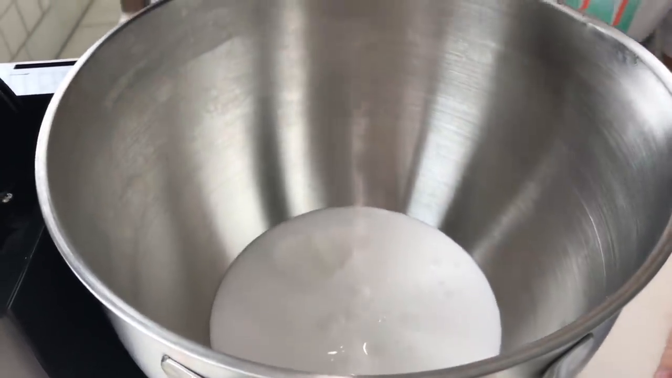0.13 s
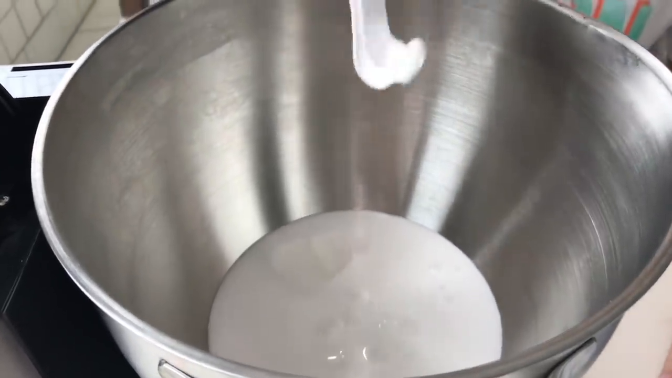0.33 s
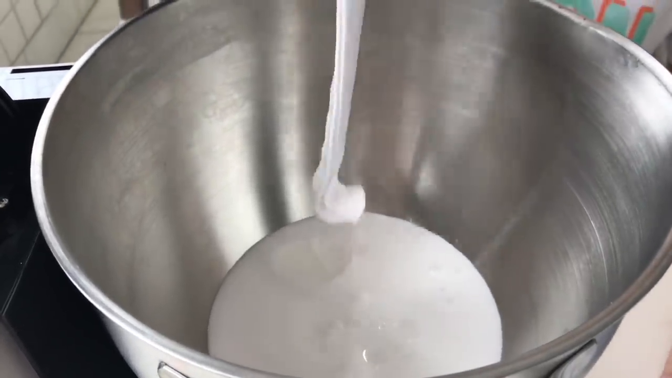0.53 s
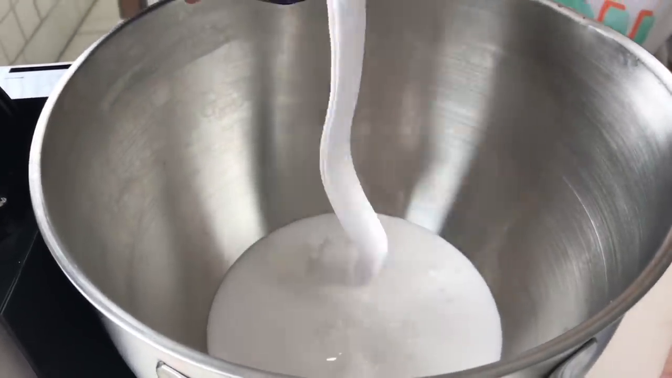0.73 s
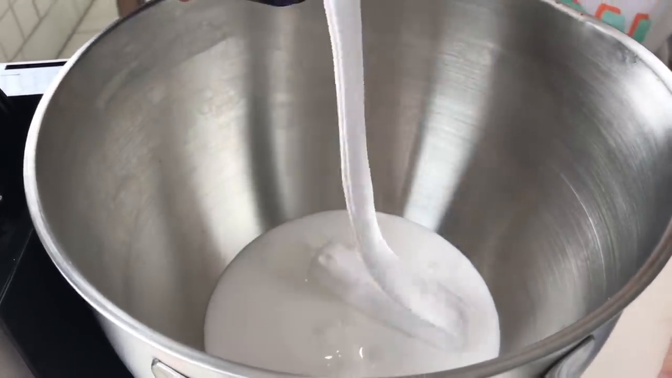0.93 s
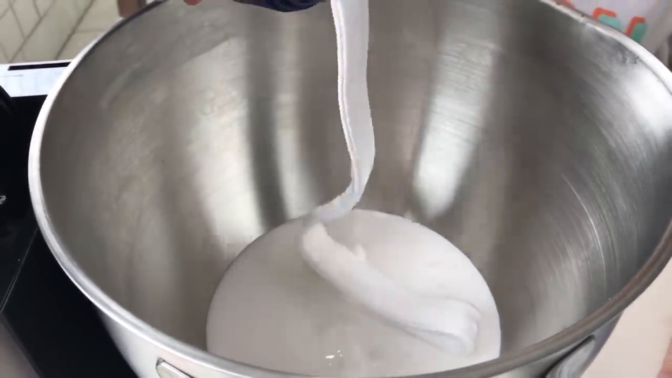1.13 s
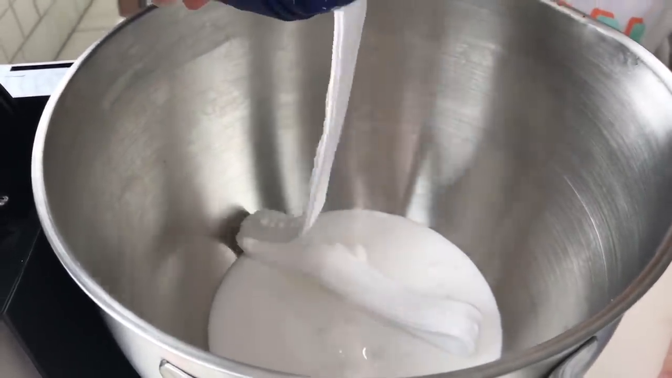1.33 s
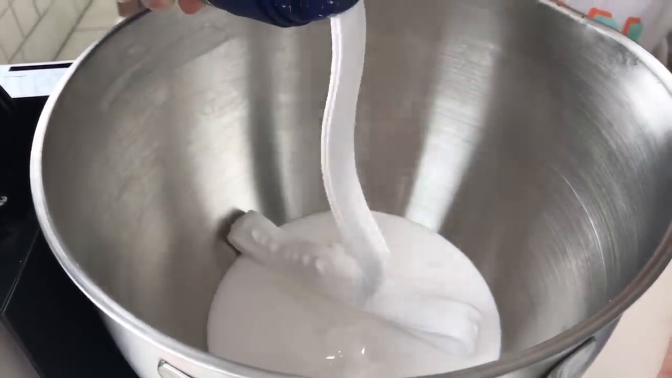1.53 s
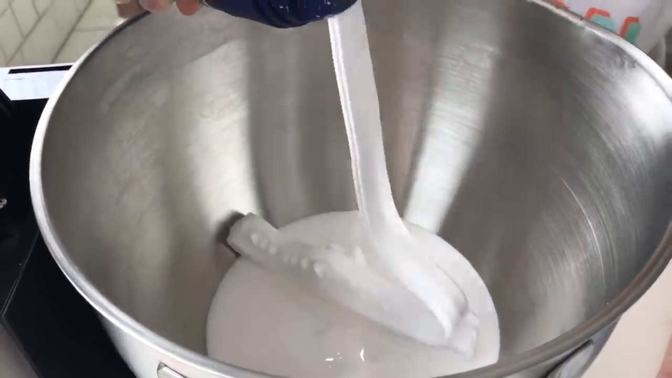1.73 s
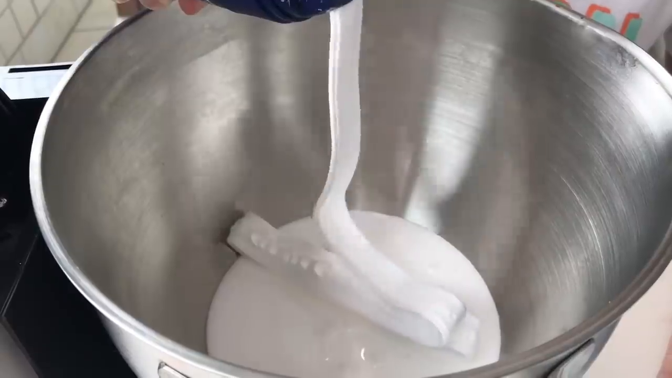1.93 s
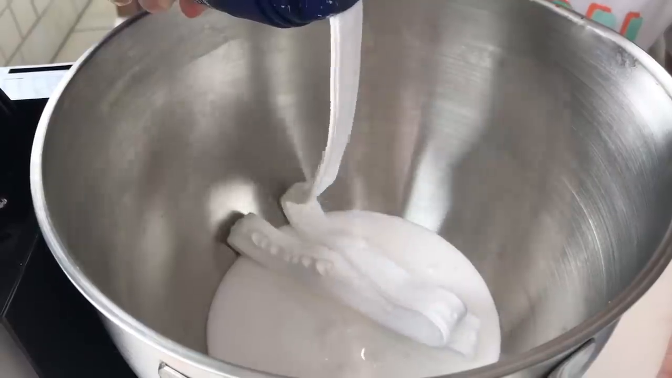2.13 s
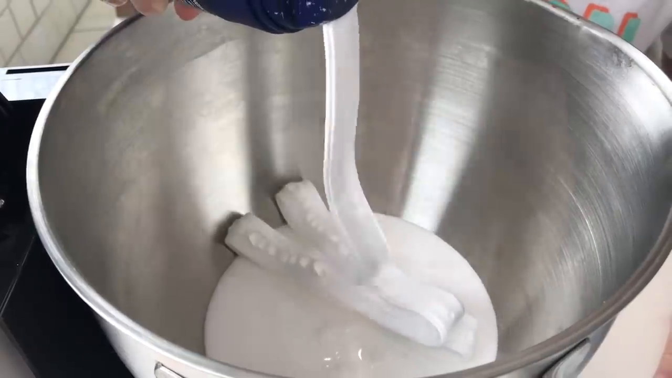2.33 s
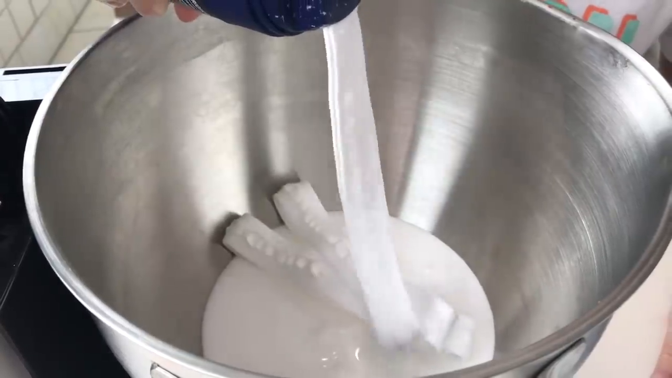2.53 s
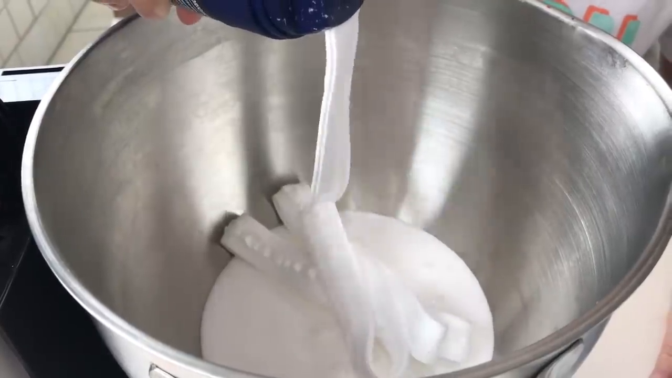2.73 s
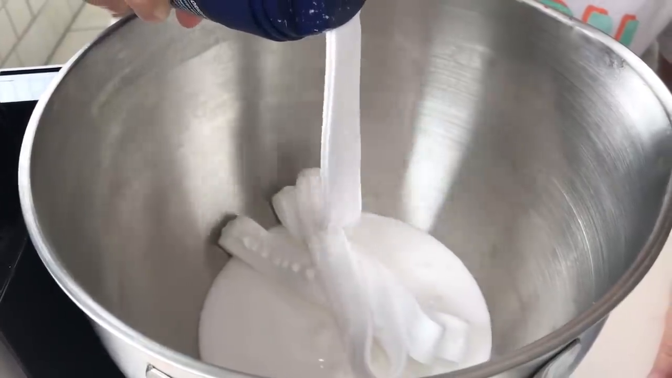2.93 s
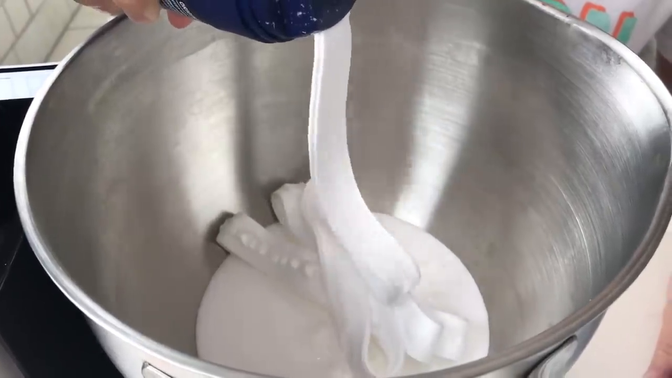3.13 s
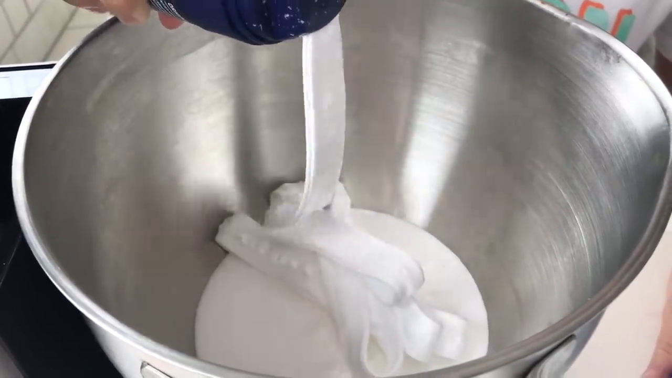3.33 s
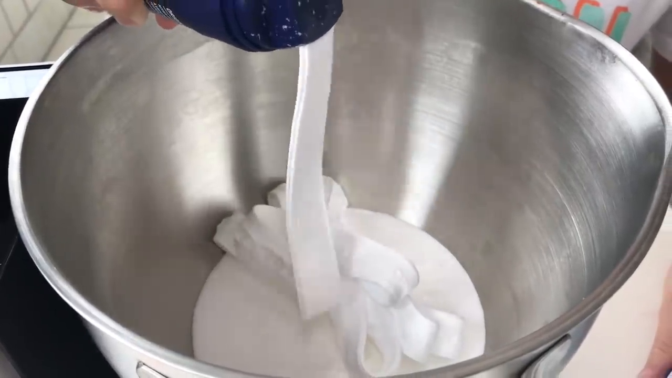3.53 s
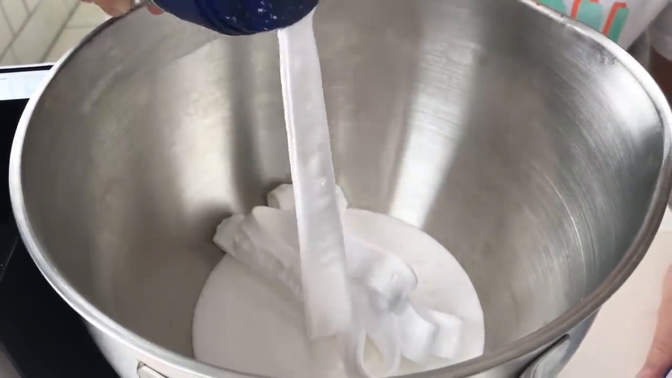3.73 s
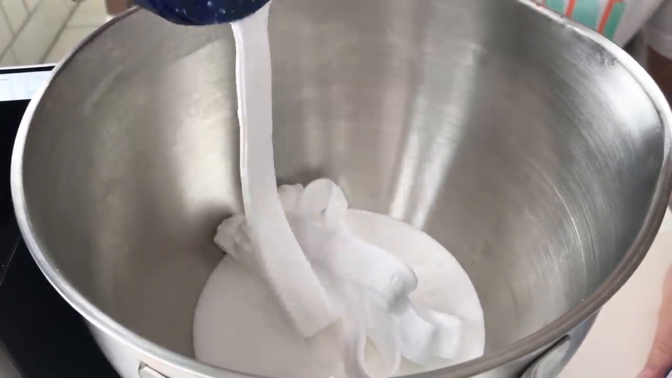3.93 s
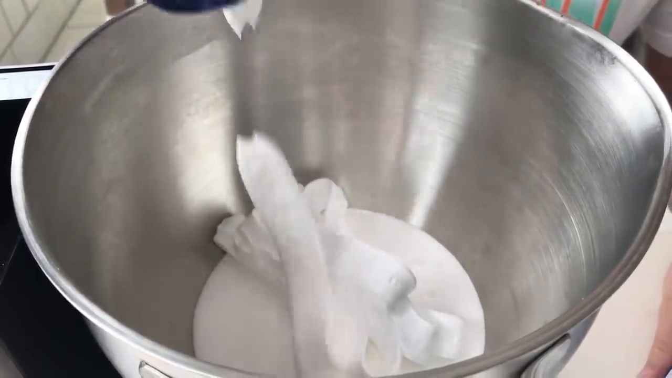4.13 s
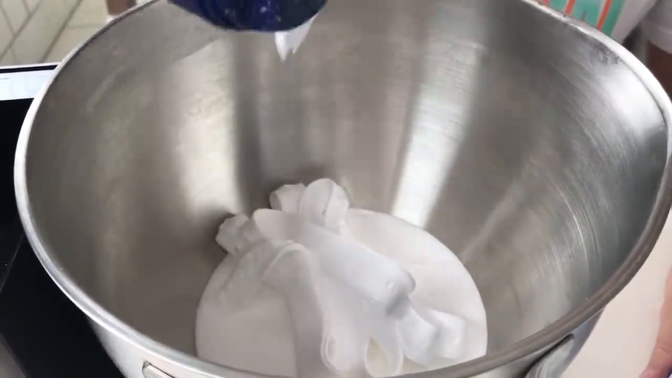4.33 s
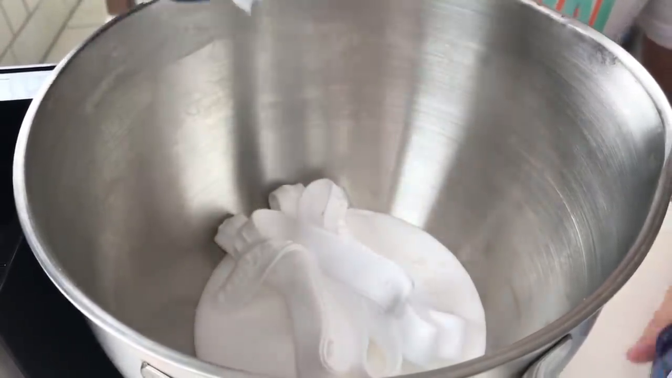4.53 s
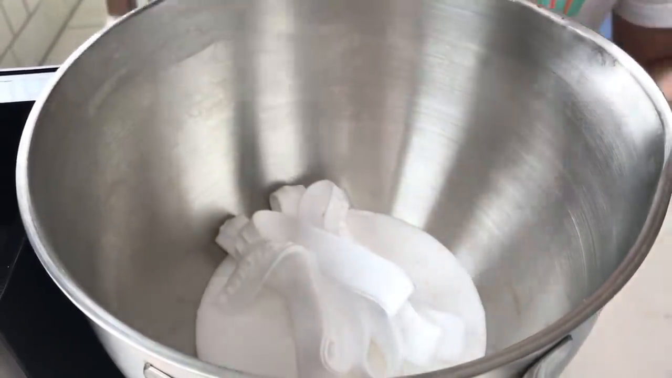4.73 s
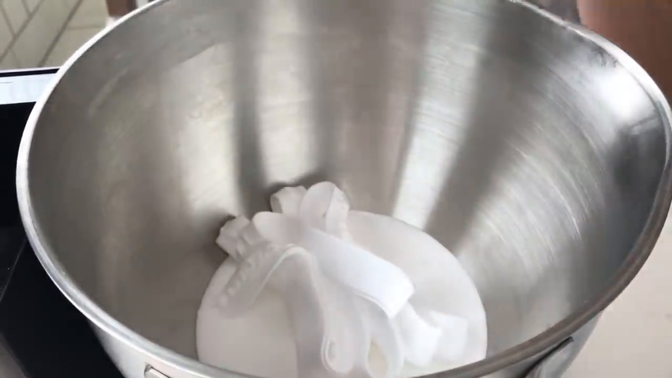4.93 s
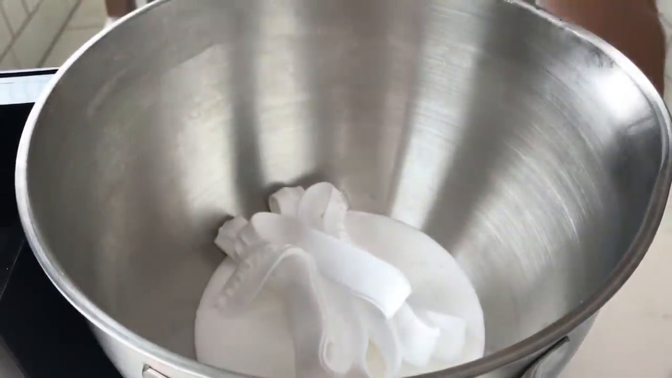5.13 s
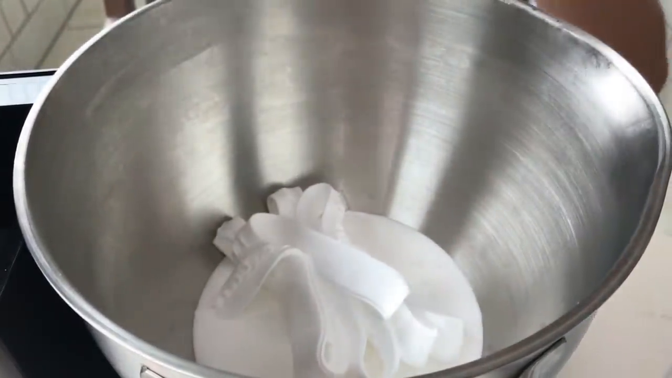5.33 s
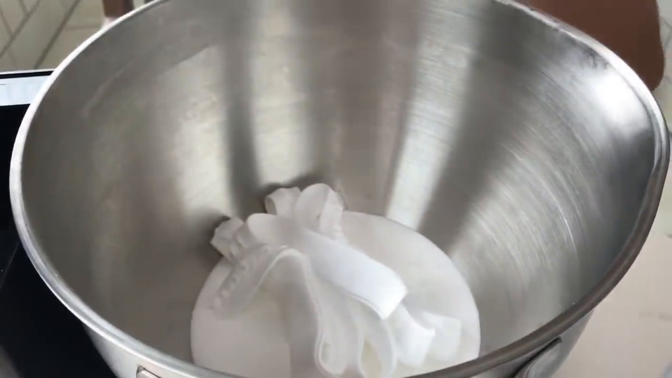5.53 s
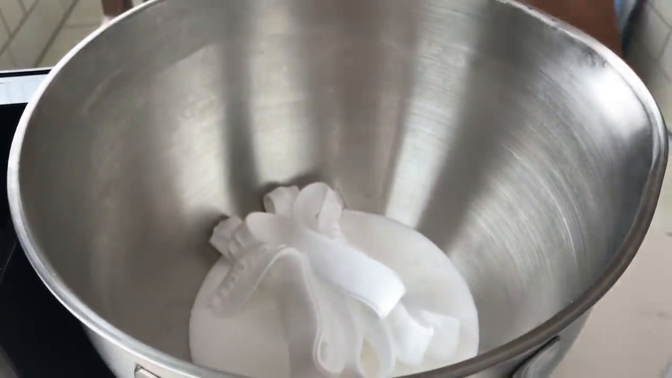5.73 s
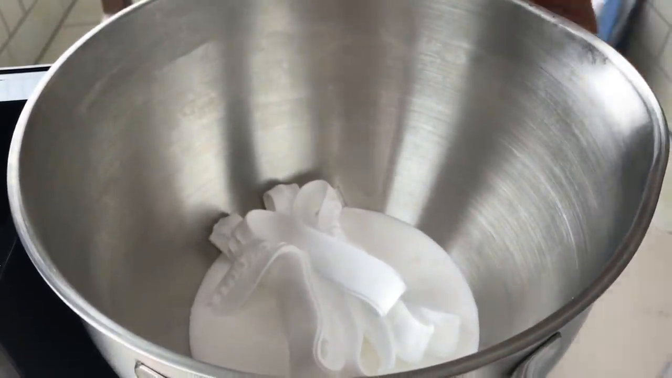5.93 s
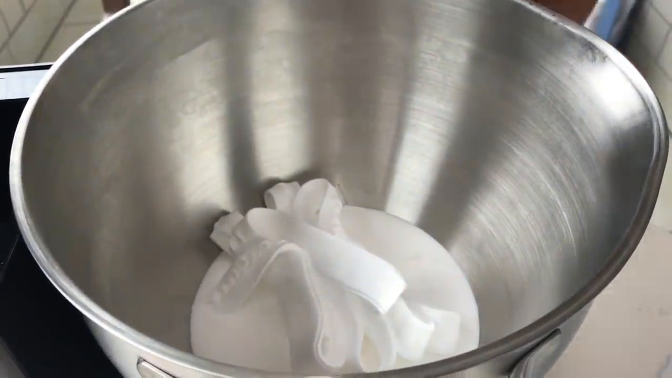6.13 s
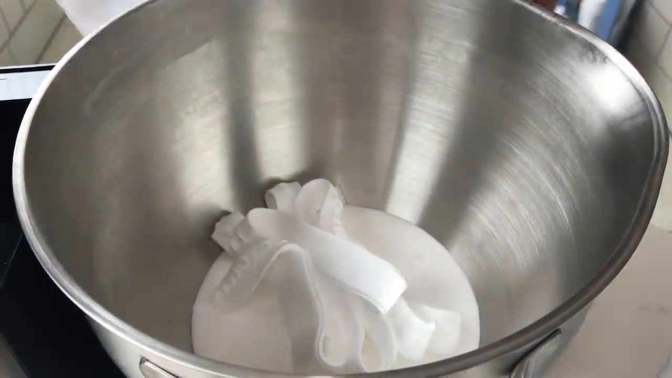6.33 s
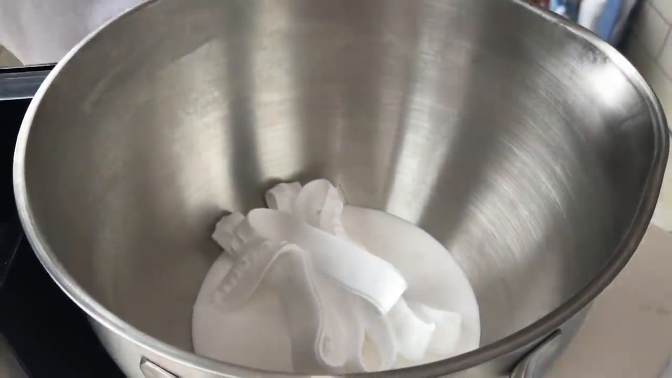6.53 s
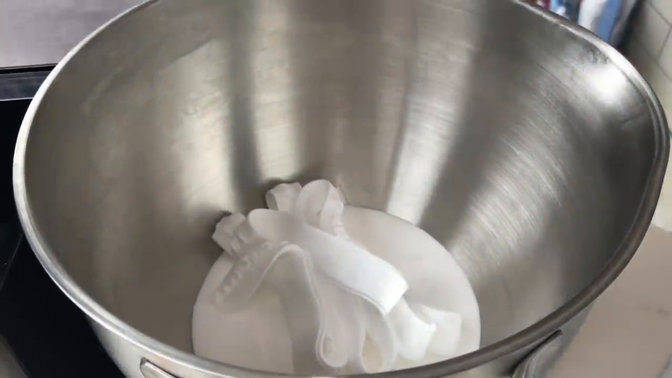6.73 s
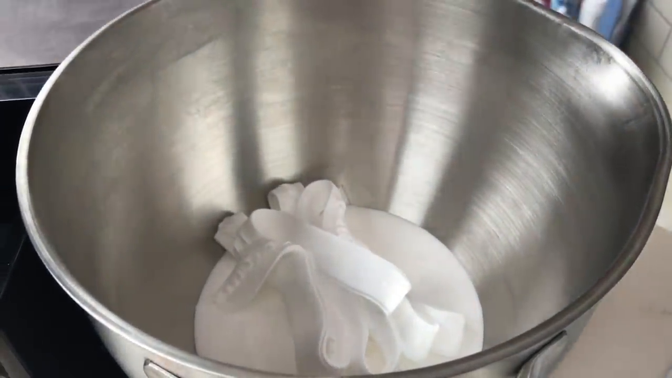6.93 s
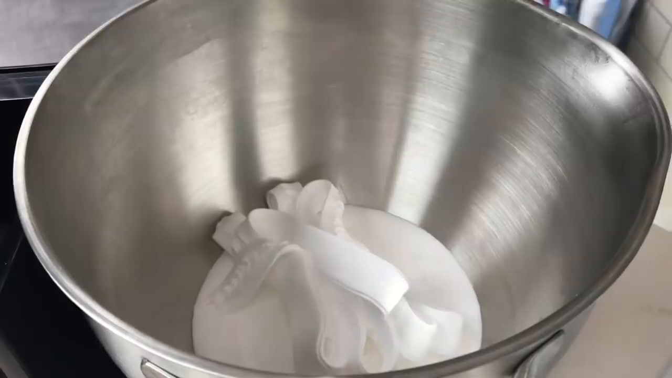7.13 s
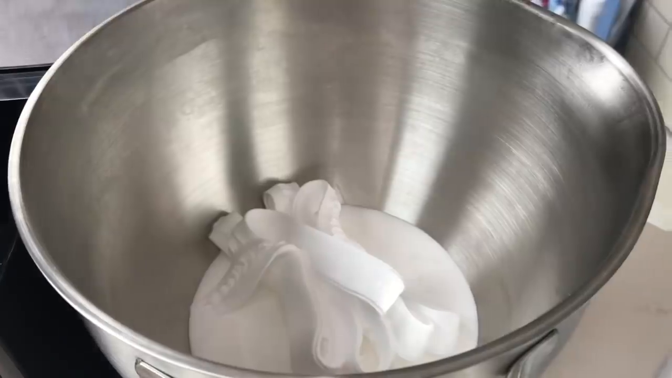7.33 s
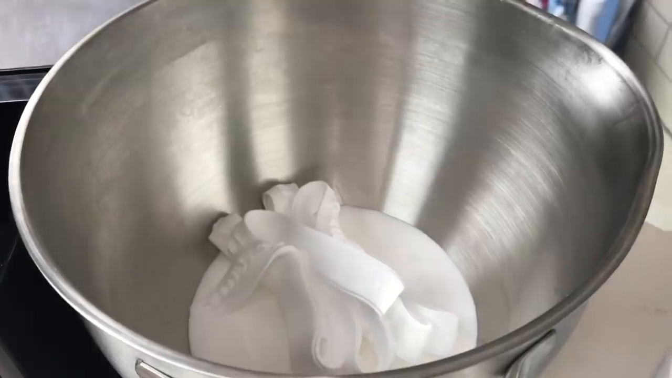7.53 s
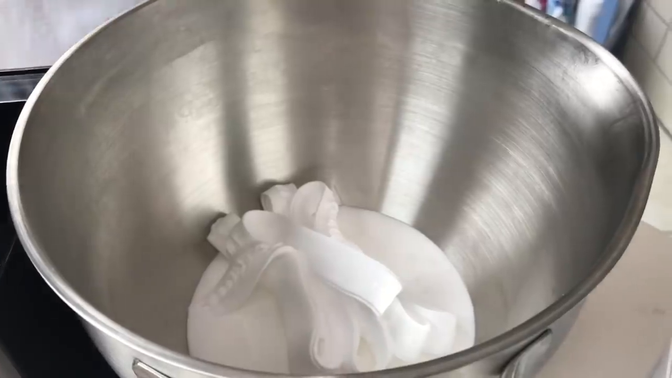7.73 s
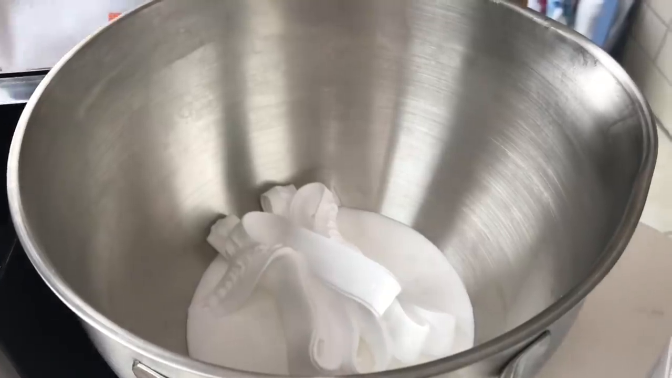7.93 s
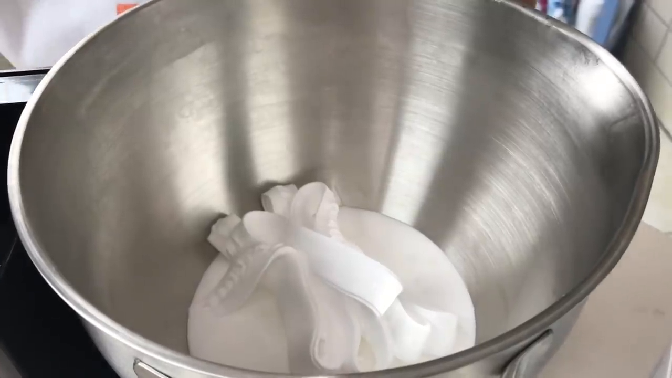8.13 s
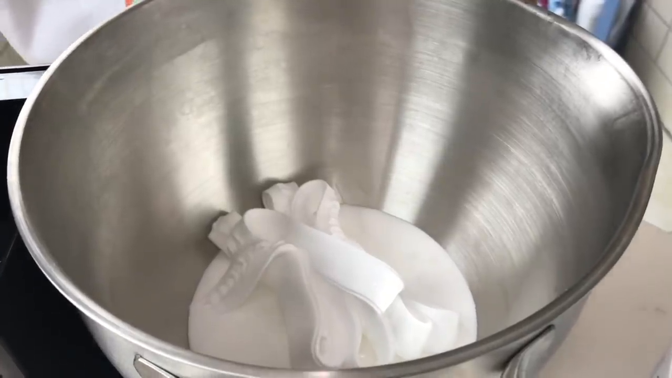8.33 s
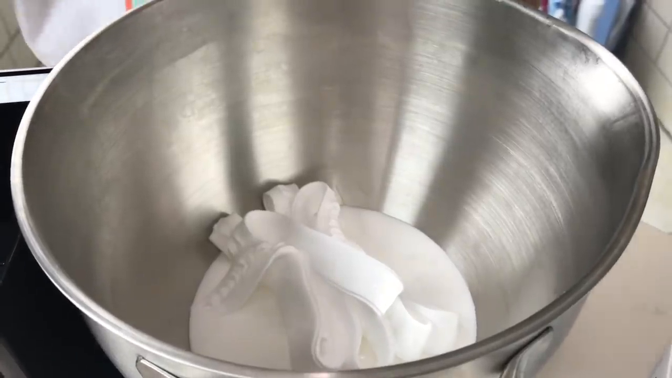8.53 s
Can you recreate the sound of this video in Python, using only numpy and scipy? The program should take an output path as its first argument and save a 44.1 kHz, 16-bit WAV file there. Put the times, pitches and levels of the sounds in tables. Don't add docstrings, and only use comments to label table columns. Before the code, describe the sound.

A spray can whistles briefly, sputters foam with a loud crackling hiss, shuts off, then gets handled before something hollow drops and bounces.

```python
import sys
import numpy as np
from scipy import signal
from scipy.fft import rfft, irfft, next_fast_len
from scipy.io import wavfile

SR = 44100
rng = np.random.default_rng(int(sys.argv[2]) if len(sys.argv) > 2 else 0)


def attenuation_scalar(level_db):
    decades = np.asarray(level_db, float) / 20
    return 10 ** decades


def pcm_store(signal):
    levels = np.round(np.clip(np.atleast_2d(signal), -1, 1) * 32767)
    wavfile.write(sys.argv[1], SR, levels.astype(np.int16).T)


N = 383096
TIME = np.arange(N) / SR

# (frequency [Hz], density [dB per Hz])
HOME_COLOUR = [(12, -47.5), (20, -20), (85, -1), (113, 2.5), (187, -5.5), (254, -4), (420, -15.5),
               (587, -12), (1120, -14), (2180, -24), (4910, -34), (9330, -38), (10400, -43), (13100, -34),
               (15900, -42.5)]
# (frequency [Hz], T60 [s])
ROOM_T60 = [(150, .5), (530, .42), (1400, .36), (3700, .34), (10000, .26)]
# (middle [s], length [s], level [dB], lowest frequency [Hz])
SWISHES = [(4.305, .04, -75, 4000), (4.646, .04, -61.5, 3000), (4.787, 0.023, -62, 2500),
           (4.868, .05, -51.5, 1750), (5.002, .04, -63.5, 2500), (5.273, 0.028, -48.5, 2974),
           (5.351, .03, -54, 2956), (5.664, 0.073, -50.5, 1690), (5.918, .015, -48, 6996),
           (6.075, 0.039, -53.5, 3960), (6.167, 0.034, -51, 3960), (6.303, 0.041, -52.5, 4020),
           (6.162, 0.23, -48, 1074), (6.599, 0.13, -59.5, 4000), (6.878, .035, -44, 5860),
           (7.344, 0.054, -62, 3020), (7.736, 0.046, -58.5, 5013), (8.139, .04, -53.5, 2500),
           (8.331, .07, -61, 4050), (8.554, 0.033, -56, 2996)]
# (time [s], level [dB])
LEAK_TONE = [
    (6.77, -66.5),
    (6.83, -54),
    (6.9, -57),
    (7.0, -67),
]
# (time [s], shell [dB], shell [Hz], thud [dB], tick [dB])
HANDLING = [(4.268, -52, 802, -50, -67.5), (4.286, -42, 1050, -54, -52), (4.615, -57, 1076, -45, -49.5),
            (4.747, -35, 1340, -32.5, -54), (5.068, -42, 1380, -45, -45.5), (5.138, -24, 890, -55, -28),
            (5.168, -22, 1650, -52, -27.5), (5.22, -33, 870, -60, -34.5), (5.324, -13.5, 940, -45, -36.5),
            (5.361, -15, 880, -39, -37), (5.373, -19, 1030, -24, -37), (5.477, -26, 1010, -19, -35.5),
            (5.502, -30, 1040, -38, -43), (5.513, -35, 799, -39, -38.5), (5.605, -35, 930, -43, -41.5),
            (5.82, -30.5, 1720, -48, -39.5), (5.903, -50, 810, -45, -46), (6.364, -18, 1090, -25.5, -26.5),
            (8.096, -27.5, 2340, -43, -33), (8.521, -43, 958, -48, -38.5)]
# (frequency [Hz], level [dB], T60 [s])
COUNTER_MODES = [(167, -10.5, 0.19), (215, -9, 0.049), (293, 5.5, 0.028), (348, -9, 0.086)]
# (time [s], level [dB])
SLIDE = [
    (5.13, -72),
    (5.15, -31.5),
    (5.21, -53.5),
    (5.28, -35.5),
    (5.32, -42.5),
    (5.4, -61.5),
    (5.5, -52),
]
# (frequency [Hz], width [Hz], level [dB])
SHELL_MODES = [(946, 256, 10.5), (1724, 100, 11.5), (2500, 180, -17), (4190, 310, -6)]
# (time [s], knock [dB], ring [dB], tick [dB], contact hardness [Hz])
DROP = [
    (7.434, 4, -4.5, -4.5, 5000),
    (7.539, -30, -25, -34.5, 1510),
    (7.617, -7, -20, -22, 2620),
    (7.7769, -9.5, -20, -32, 1533),
]
# (frequency [Hz], level [dB], T60 [s])
DROPPED_MODES = [(268, -14, .14), (579, -17, .5), (618, -9, .3), (920, -6, .1), (1003, -9, .14),
                 (1080, -12, .12), (1447, -13, .14), (1653, -10, .15), (1853, -14, .09), (2078, -9, .11),
                 (2355, -10, .1), (2453, -13, .08), (2752, -19, .08), (3284, -15, .07)]
# (time [s], level [dB])
GAS_JET = [
    (.012, -41.5),
    (.026, -13),
    (.045, -11),
    (.09, -4.5),
    (.15, 1.5),
    (.172, -10),
    (.19, -37.5),
    (.25, -38.5),
    (.33, -48),
]
# (frequency [Hz], density [dB per Hz])
GAS_COLOUR = [(120, -44), (200, -10), (288, -21.5), (379, -11.5), (2840, -11), (3470, -7), (6240, -4),
              (8520, -6.5), (15900, -2.5)]
# (frequency [Hz], width [Hz], level [dB])
GAS_PIPES = [(3390, 180, -3.5), (3780, 35, -7), (5438, 200, -9.5), (6930, 76, -2.5), (8570, 80, 2.5),
             (9780, 40, 5), (10880, 61, 2.5), (11600, 73, 3), (13580, 83, 0), (15520, 67, 0.5)]
# (time [s], frequency [Hz], level [dB])
WHISTLE = [
    (.016, 4365, -46),
    (0.029, 4100, -7.5),
    (.045, 3814, -24),
    (0.091, 3400, -22.5),
    (0.154, 3730, -15.5),
    (0.164, 4375, -0.5),
    (.174, 4445, -1),
    (.19, 4230, -29),
    (0.241, 4350, -45.5),
]
# (time [s], valve pressure [dB], gas pocket size [dB])
FLOW = [
    (.15, 4.5, 8.5),
    (.27, -9.5, -8),
    (0.408, 2.5, -1),
    (0.901, -0.5, -2.5),
    (1.6, -2, -4),
    (2.3, -1, -6.5),
    (2.9, 5.5, 3),
    (3.35, 8.5, 5.5),
    (3.62, 5.5, 2.5),
]
# (time [s], upper minus lower tube modes [dB])
MOUTH = [
    (.28, 3.5),
    (.42, -10.5),
    (.62, -3),
    (.75, 0),
    (1.0, 0),
    (1.5, -2),
    (2.3, 1),
    (2.85, -1.5),
    (3.5, 0.2),
]
# (frequency [Hz], density [dB per Hz])
HISS_COLOUR = [(53, -51.5), (90, -29.5), (157, -12), (182, -13.5), (209, -4.5), (364, -13), (484, -4.5),
               (717, -19.5), (866, -14), (1140, -6), (1220, 1.5), (1640, -2.5), (1930, -13.5), (2120, -4),
               (2300, -13.5), (2990, -33), (5060, -120)]
# (frequency [Hz], density [dB per Hz])
TOP_COLOUR = [(2710, -36), (4600, -8), (5020, -8.5), (5290, -5), (6210, -2.5), (8260, -7), (9700, -9),
              (10600, -10.5), (15100, -15), (15900, -21)]
# (frequency [Hz], width [Hz], level [dB])
NOZZLE_MODES = [(1404, 270, -7), (2194, 92, -1.5), (2602, 150, 3), (3235, 130, 3), (3781, 200, 2.5),
                (4443, 160, 4.5)]
# (time [s], level [dB])
BIG_POPS = [(0.2645, -10.5), (0.322, -7.5), (.367, -8), (0.3964, -3.5), (0.4341, -3), (0.4474, -8),
            (.477, -2.5), (.53, -2), (0.5674, -1), (0.5796, -2), (0.6022, -12), (0.618, -1.5), (0.652, -3.5),
            (0.6687, -4), (0.684, -2), (.7534, -7.5), (0.8067, -7), (.8165, -2), (0.89, -5.5), (0.95, -5),
            (.961, -3), (1.0736, -.5), (1.0981, -4), (1.189, -1.5), (1.2479, -2), (1.4444, -6.5), (1.516, -5),
            (1.545, -10), (1.6266, -4), (1.8005, -4.5),
            (1.961, -9.5), (2.2037, -4), (2.2411, -6), (2.2666, -4.5), (2.2891, -10), (2.306, -8.5),
        (2.4186, -8.5), (2.4608, -8.5), (2.5178, -7), (2.631, -8.5), (2.6506, -10.5), (2.681, -3),
        (2.6959, -9), (2.797, -9), (2.8472, -1), (2.882, -9), (2.959, -4.5), (2.9856, -5), (3.1032, -3),
        (3.1317, 0), (3.1685, 0.5), (3.242, 2), (3.304, -6), (3.3385, 2), (3.3758, 8), (3.4243, -0.5),
        (3.439, 1), (3.456, -5.5), (3.5279, 0.5), (3.5602, -3)]
# (time [s], peak [dB])
SPITS = [(0.3127, -6.5), (0.6605, -11), (0.6858, -10.5), (0.9338, -18), (1.0725, -17), (1.8015, -4),
         (2.7424, -6.5), (2.8828, -5.5), (3.0066, -6), (3.0824, -14), (3.1318, -9.5), (3.1792, -8),
         (3.3693, -10.5), (3.5466, -2)]


def rms_one(x):
    return x / np.sqrt(np.mean(x ** 2) + 1e-20)


def in_time(rows):
    s, *columns = np.transpose(rows)
    return [attenuation_scalar(np.interp(TIME, s, c, left=-140, right=-140)) for c in columns]


def at_hz(points, hz):
    table_hz, value = np.array(points).T
    return np.interp(np.log(hz), np.log(table_hz), value)


def noise(colour):
    size = next_fast_len(N)
    hz = np.arange(size // 2 + 1) * SR / size + 1
    spectrum = rfft(rng.standard_normal(size)) * attenuation_scalar(at_hz(colour, hz))
    return rms_one(irfft(spectrum, size)[:N])


def drift(rate_hz):
    r = np.exp(-2 * np.pi * rate_hz / SR)
    return rms_one(signal.lfilter([1], [1, -2 * r, r * r], rng.standard_normal(N + SR))[SR:])


def filtered(x, hz, kind):
    return signal.sosfilt(signal.butter(2, hz, kind, fs=SR, output="sos"), x)


def resonate(x, hz, width_hz):
    r = np.exp(-np.pi * width_hz / SR)
    poles = [1, -2 * r * np.cos(2 * np.pi * hz / SR), r * r]
    return signal.lfilter([(1 - r * r) / 2, 0, (r * r - 1) / 2], poles, x)


def train(times_s, db):
    out = np.full(N, 1e-18)
    np.add.at(out, (np.asarray(times_s) * SR).astype(int), attenuation_scalar(db))
    return out


def puff(clicks, decay_s):
    return signal.lfilter([1], [1, -np.exp(-1 / (decay_s * SR))], clicks) * rng.standard_normal(N)


def struck(times_s, db, modes, spread_db):
    luck = rng.standard_normal((len(times_s), len(modes)))
    out = np.zeros(N)
    first = int(min(times_s) * SR)
    for k, (hz, mode_db, t60_s) in enumerate(modes):
        r, w = attenuation_scalar(-60 / (t60_s * SR)), 2 * np.pi * hz / SR
        blows = train(times_s, db + mode_db + spread_db * luck[:, k])[first:]
        out[first:] += signal.lfilter([0, np.sin(w)], [1, -2 * r * np.cos(w), r * r], blows)
    return out


def home_hum():
    return attenuation_scalar(-43.5 + 1.5 * drift(3.6)) * noise(HOME_COLOUR)


def kitchen(x):
    t = TIME[:SR // 2]
    edges_hz = 90 * 2 ** np.arange(0, 7.6, .5)
    tail = 0
    for low_hz, high_hz in zip(edges_hz, edges_hz[1:]):
        band = filtered(rng.standard_normal(len(t)), [low_hz, high_hz], "band")
        tail = tail + band * attenuation_scalar(-60 * t / at_hz(ROOM_T60, np.sqrt(low_hz * high_hz)))
    tail = tail * np.clip((t - .003) / 0.0052, 0, 1)
    return signal.fftconvolve(x, tail / np.sqrt(np.sum(tail ** 2)))[:N]


def rustle():
    grain = filtered(rng.standard_normal(N), 14000, "low") * attenuation_scalar(1.6 * drift(70))
    leak = rms_one(resonate(resonate(grain, 2500, 120), 2500, 120))
    out = in_time(LEAK_TONE)[0] * leak
    for s, length_s, db, low_hz in SWISHES:
        near = slice(int((s - 3 * length_s) * SR), int((s + 3 * length_s) * SR))
        bell = np.exp(-.5 * ((TIME[near] - s) / length_s) ** 2)
        cloth = filtered(grain[near], low_hz, "high")
        cloth = filtered(cloth, [low_hz, min(4 * low_hz, 15500)], "band")
        out[near] += attenuation_scalar(db + 3) * bell * cloth
    return out


def slide():
    rub = rng.standard_normal(N) * attenuation_scalar(3 * drift(80))
    wall = sum(attenuation_scalar(db) * resonate(rub, hz, width_hz) for hz, width_hz, db in SHELL_MODES)
    return in_time(SLIDE)[0] * rms_one(wall)


def handling():
    s, shell_db, shell_hz, thud_db, tick_db = np.transpose(HANDLING)
    tick_hz = np.clip(4770 + 61 * (tick_db - shell_db + 9.5), 2500, 9000)
    thud = struck(s + 0.00286, thud_db - 0.5, COUNTER_MODES, 0.5)
    out = filtered(filtered(thud, 113, "high"), 1400, "low")
    t = TIME[:SR // 20]
    for k, grit in enumerate(rng.standard_normal((len(s), len(t)))):
        ring = np.sin(2 * np.pi * shell_hz[k] * t) * np.exp(-t / 0.0027) * t / (t + 0.0041)
        scuff = filtered(grit * np.exp(-t / 0.005), [700, 2600], "band")
        shell = filtered(ring + 0.47 * scuff, 2000, "low")
        tick = resonate(grit * np.exp(-t / 0.0035), tick_hz[k], 0.93 * tick_hz[k])
        at = int(s[k] * SR)
        out[at:at + len(t)] += attenuation_scalar(shell_db[k] + 13.0) * shell + attenuation_scalar(tick_db[k] + 6) * tick
    return out + slide()


def drop():
    knock_modes = [(986, 0.0, 0.017), (1190, -3, 0.017), (1900, -7.5, 0.008), (2374, -10.0, 0.0085)]
    out = 0
    for s, knock_db, ring_db, tick_db, hard_hz in DROP:
        knock = filtered(struck([s], knock_db, knock_modes, 1.3), 650, "high")
        ring = struck([s], ring_db, DROPPED_MODES, 1)
        clatter = filtered(puff(train([s], knock_db + 3.5), 0.0048), [750, 3300], "band")
        tick = filtered(puff(train([s], tick_db), 0.0017), [2800, 7000], "band")
        out = out + filtered(knock + ring + clatter, hard_hz, "low") + tick
    return filtered(out, 360, "high")


def whistle():
    s, hz, db = np.transpose(WHISTLE)
    phase = 2 * np.pi * np.cumsum(np.interp(TIME, s, hz) + 340 * drift(600)) / SR
    tone = np.sin(phase) * (1 + .5 * drift(200))
    fifth = attenuation_scalar(-1.5) * drift(290) * np.sin(1.55 * phase)
    return in_time(np.transpose([s, db]))[0] * (tone + fifth)


def gas():
    air = noise(GAS_COLOUR)
    sung = 0
    for k, (hz, width_hz, db) in enumerate(GAS_PIPES):
        sung = sung + attenuation_scalar(db) * resonate(air, hz, width_hz + 150) * (-1) ** k
    jet = in_time(GAS_JET)[0] * rms_one(air + 1.6 * rms_one(sung))
    thump = filtered(train([.163], 7), [450, 1100], "band")
    return thump + jet + whistle()


def valve():
    shut_s, shut_db_per_s2 = 3.609, 3297.5
    s, pressure_db, pocket_db = np.transpose(FLOW)
    shut_db = -shut_db_per_s2 * np.clip(TIME - shut_s, 0, .3) ** 2 - 140 * (TIME < s[0])
    return np.interp(TIME, s, pressure_db), np.interp(TIME, s, pocket_db), shut_db


def pockets(size_db):
    mean_gap_s, level_db, spread_db, refill_s = .014, -11, 4, 0.0048
    big_s, big_db = np.transpose(np.array(BIG_POPS))
    luck = rng.random((250, 2))
    s = .29 + np.cumsum(mean_gap_s * (.4 + 1.8 * luck[:, 0] ** 2))
    nearest_s = np.abs(s[:, None] - big_s).min(axis=1)
    db = level_db + size_db[(s * SR).astype(int)] + spread_db * 3.4 * (luck[:, 1] - .5)
    db = db - 20 * np.exp(-(nearest_s / refill_s) ** 2)
    return np.r_[big_s, s], np.r_[big_db, db]


def small_pops():
    born = rng.random(N) < 600 / SR
    height = attenuation_scalar(4.0 * np.minimum(rng.exponential(1, N), 3))
    return rms_one(puff(born * height, .0006))


def nozzle_tube(s, pop_db, pressure_db, steady):
    tear_s, choke_db, choked_width, choked_top_db = .0019, 10.5, 2.2, -6.5
    luck = rng.standard_normal((len(s), len(NOZZLE_MODES)))
    tear = rng.random((len(s), 2, 3))
    later_s = tear_s * np.arange(3) * (.7 + .6 * tear[:, 0])
    weaker_db = -(4.5 + 3 * s[:, None]) * np.arange(3) * (.5 + tear[:, 1])
    tilt_db = np.interp(TIME, *np.transpose(MOUTH))
    choked = np.clip(pressure_db / choke_db, 0, 1)
    vented = rng.standard_normal(N)
    tube = 0
    for k, (hz, width_hz, db) in enumerate(NOZZLE_MODES):
        lean = attenuation_scalar(np.clip((hz - 3450) / 600, -.4, .9) * (tilt_db + 0.5))
        height_db = pop_db + 26.5 + 1.7 * luck[:, k]
        snap = sum(train(s + later_s[:, j], height_db + weaker_db[:, j]) for j in range(3))
        burst = snap + signal.lfilter([1], [1, -.988], snap) * vented / 12
        mute = attenuation_scalar(choked_top_db * choked * (k == len(NOZZLE_MODES) - 1))
        push = lean * mute * (burst + steady)
        free = resonate((1 - choked) * push, hz, width_hz)
        damped = resonate(choked * push, hz, choked_width * width_hz)
        tube = tube + attenuation_scalar(db) * (free + 0.57 * damped) * (-1) ** k
    return filtered(filtered(tube, 5600, "low"), 5600, "low")


def foam():
    pressure_db, pocket_db, shut_db = valve()
    swell_db = -7 * np.exp(-TIME / 0.73)
    hiss = attenuation_scalar(-24 + .25 * pressure_db + swell_db + shut_db)
    ring = attenuation_scalar(-26 + pressure_db + 1.5 * shut_db)
    small = attenuation_scalar(-27.5 + pocket_db + 2.5 * shut_db)
    top = attenuation_scalar(-30 + .48 * pressure_db + .8 * shut_db)
    surge = attenuation_scalar(1.0 * drift(35) + 0.59 * drift(7.7))
    s, pop_db = pockets(pocket_db + 3 * shut_db)
    flow = ring * surge * attenuation_scalar(4.0) * rng.standard_normal(N)
    tube = nozzle_tube(s, pop_db, pressure_db, flow + attenuation_scalar(17.5) * small * small_pops())
    flutter = puff(train(s, pop_db + 3 * rng.standard_normal(len(s))), 0.0024)
    lip = top ** 2 * attenuation_scalar(55) * resonate(resonate(flutter, 6300, 994.5), 6300, 1100)
    spit_s, spit_db = np.transpose(SPITS)
    vent = np.abs(puff(attenuation_scalar(-19.5) * train(s, pop_db) + attenuation_scalar(-8) * train(spit_s, spit_db), 0.0034))
    spray_top = noise(TOP_COLOUR) * (top * surge + vent)
    return hiss * surge * attenuation_scalar(3.0) * noise(HISS_COLOUR) + tube + lip + spray_top


def scene():
    spray, hand, fall = gas() + foam(), handling(), drop()
    wet = kitchen(attenuation_scalar(-11.5) * spray + attenuation_scalar(-8.5) * hand + attenuation_scalar(-6.0) * filtered(fall, 4080, "low"))
    return (spray + hand + fall + wet + rustle() + home_hum())[None]


def low_pass(x):
    return signal.sosfilt(signal.butter(12, 15780, fs=SR, output="sos"), x)


def record(dry):
    overloaded = dry / (1 + np.abs(dry / 1.05) ** 6) ** (1 / 6)
    return low_pass(overloaded)


dry = scene()
out = record(dry)
pcm_store(out)
```